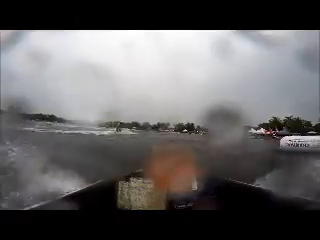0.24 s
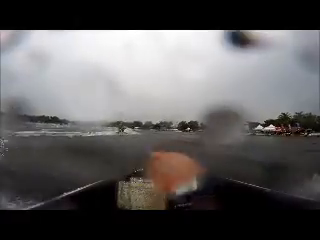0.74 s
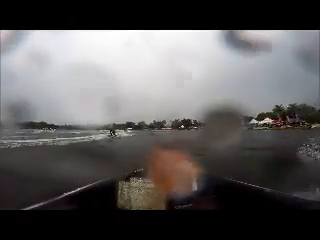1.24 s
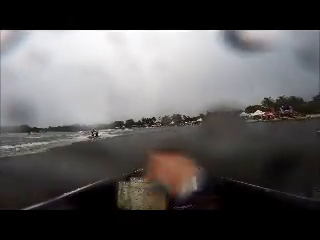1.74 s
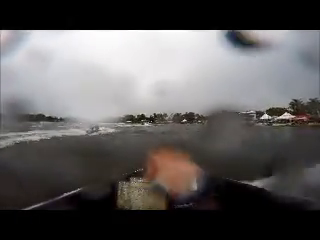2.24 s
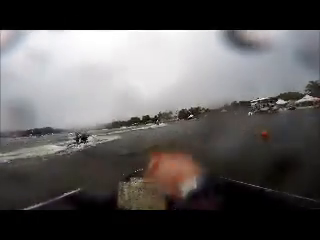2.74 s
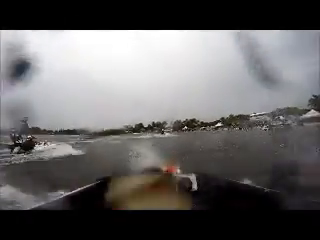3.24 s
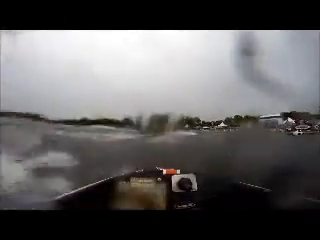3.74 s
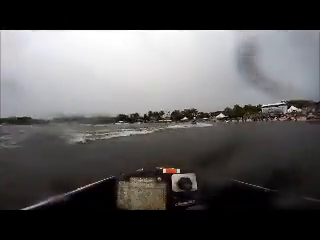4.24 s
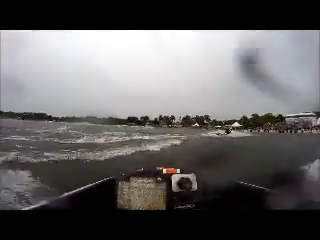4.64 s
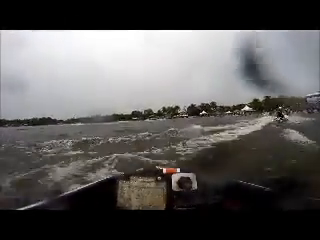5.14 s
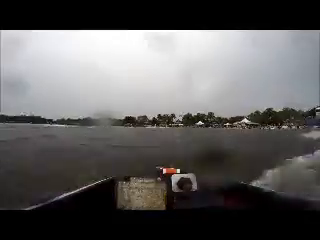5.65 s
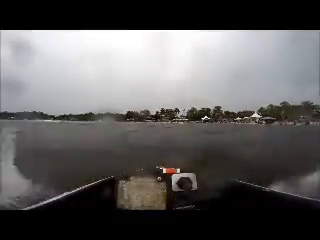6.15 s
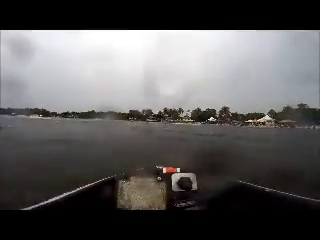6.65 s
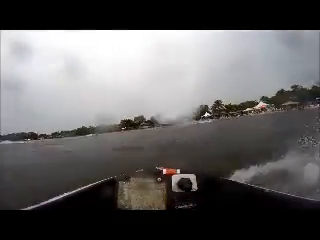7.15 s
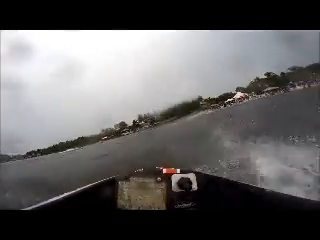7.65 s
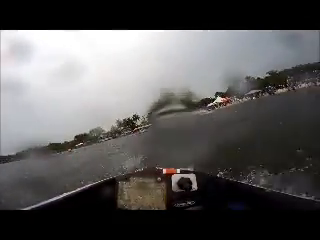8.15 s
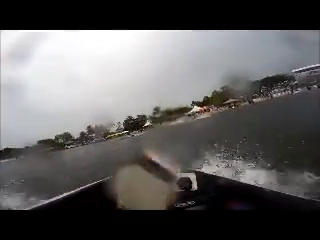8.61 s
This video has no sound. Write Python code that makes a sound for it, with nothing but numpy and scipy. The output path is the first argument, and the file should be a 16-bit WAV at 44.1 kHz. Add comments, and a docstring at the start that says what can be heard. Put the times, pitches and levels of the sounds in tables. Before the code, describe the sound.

Heard from its deck, a speeding personal watercraft booms and revs in short bursts, with waves knocking the hull and spray ticking.

```python
"""Out on choppy water, a personal watercraft races along, heard from a sealed camera fixed to its deck.
The engine booms through the deck while the jet pump bites; each time the intake gulps air, the crank
runs free and flares into an exhaust note and a rasp in the hull. Underneath, the hull rumbles and water
rushes along it; waves slap and slam it, and spray ticks on the camera housing."""
import sys
import numpy as np
from scipy import signal
from scipy.fft import rfft, irfft
from scipy.io import wavfile
from scipy.ndimage import uniform_filter1d

SR = 44100
rng = np.random.default_rng(int(sys.argv[2]) if len(sys.argv) > 2 else 0)


def dump(signal):
    """Clip the signal to [-1, 1] and save it as 16-bit WAV at the path in sys.argv[1]."""
    limited = np.clip(np.atleast_2d(signal).T, -1, 1)
    pcm = np.round(limited * 32767).astype(np.int16)
    wavfile.write(sys.argv[1], SR, pcm)


N = 391608
T = np.arange(N) / SR

# hull panel resonances: f/Hz, width/Hz, boost/dB
PANEL_MODES = [(817.4, 31, 8), (1111, 150, 10.5), (1269, 85, 4.5), (1550, 71, 8), (1770, 57, 3),
               (1883, 58, 4), (2120, 55, 1.5), (2363, 52, 3.5)]
# colour of water striking the hull: f/Hz, level/dB
SLAP_EQ = [(80, -1), (170, 12), (300, 2.5), (600, -3), (900, -12), (1150, -5), (1600, -7.5), (2300, 1),
           (2700, -12.5), (3300, -21), (4200, -25), (5000, -36), (7000, -38), (9000, -56.5)]
# colour of the camera housing: f/Hz, level/dB
HOUSING_EQ = [(500, -9.5), (2000, 4), (3000, 1), (4700, -7.5), (6500, -7), (8000, -16.5), (9200, -22),
              (11500, -24)]
# the intake gulps air and the engine flares: t at the top/s, run-up/s, hold/s, slowing/s,
# air after the top/s, top crank speed/Hz, rasp/dB, exhaust/dB, loose panel/dB, rasp decay/s
ENGINE_FLARES = [(1.075, .13, 0.0074, .05, 0.014, 72.88, -23, -19.5, -27, 0.024),
                 (1.139, .17, 0.034, 0.085, 0.026, 82.56, -25.5, -30, -34, 0.021),
                 (1.469, 0.12, .01, .05, 0.018, 74.64, -28, -23.5, -33, 0.045),
                 (1.586, .21, 0.047, 0.1, 0.076, 102.7, -18, -19, -22.5, 0.054),
                 (1.665, 0.19, .051, 0.067, 0.062, 94.55, -19.5, -22.5, -20.5, 0.034),
                 (1.911, 0.085, .04, .063, 0.058, 81.1, -25, -24.5, -37, .04),
                 (2.14, 0.094, 0.044, 0.063, 0.076, 92.8, -25, -28, -26, 0.062),
                 (2.281, 0.033, .01, .04, 0.037, 79, -25, -21.5, -44, 0.048),
                 (2.375, 0.12, 0.037, 0.061, 0.042, 103, -20.5, -21.5, -22.5, .03),
                 (2.499, 0.049, 0.0097, 0.038, 0.035, 75.15, -28, -23.5, -44, 0.041),
                 (2.564, .09, .08, .12, 0.058, 83.87, -27.5, -31.5, -42, 0.033),
                 (2.889, .1, 0.011, 0.052, 0.033, 73.9, -23, -20.5, -43, .05),
                 (2.964, 0.16, .03, 0.099, 0.04, 94.37, -18.5, -22.5, -23, .016),
                 (4.058, .14, .02, .079, 0.016, 79.53, -26.5, -26, -44, 0.061),
                 (4.314, .16, .05, .12, 0.0084, 78.9, -22, -21, -26.5, 0.074),
                 (4.685, .08, 0.0096, 0.044, .02, 69.13, -25, -21, -35, 0.059),
                 (4.83, .18, 0.16, .11, 0.17, 107.6, -17.5, -19, -33, 0.037),
                 (5.256, .11, 0.0096, 0.048, 0, 78.85, -29.5, -25.5, -37, 0.067),
                 (5.374, 0.18, 0.075, 0.063, 0, 104.1, -20, -19.5, -33, 0.011),
                 (5.632, 0.069, .066, .07, 0.049, 84.3, -25.5, -25, -37, 0.058),
                 (5.86, 0.068, 0.036, .069, 0.041, 68.74, -28, -28.5, -47, 0.043),
                 (6.191, .14, 0.0092, 0.073, 0.026, 90.1, -19.5, -22.5, -45, 0.021)]


def amp(db):
    """Decibels to gain."""
    return 10 ** (np.asarray(db) / 20)


def unit(x):
    """Scales to rms 1."""
    return x / np.sqrt(np.mean(x ** 2) + 1e-20)


def eq_db(eq, hz):
    """Reads an EQ curve on a log-frequency axis."""
    f, db = np.transpose(eq)
    return np.interp(np.log(hz + 1), np.log(f), db)


def body(x, eq, modes=(), size=8192):
    """Plays x through a body: a minimum-phase EQ curve with resonances on top."""
    hz = abs(np.fft.fftfreq(size, 1 / SR))
    db = eq_db(eq, hz) + sum(boost / (1 + (2 * (hz - f) / width) ** 2) for f, width, boost in modes)
    spectrum = np.exp(np.conj(signal.hilbert(np.log(amp(db)))))
    impulse = np.fft.ifft(spectrum).real[:size // 2]
    return signal.oaconvolve(x, impulse)[:len(x)]


def ring(x, hz, width_hz):
    """One steep resonance: two band-passes in series."""
    b, a = signal.iirpeak(hz, hz / width_hz, SR)
    return signal.lfilter(b, a, signal.lfilter(b, a, x))


def wander(hz):
    """Smooth random modulation of rms 1, rolling off above hz."""
    f = np.fft.rfftfreq(N, 1 / SR)
    return unit(irfft(rfft(rng.standard_normal(N)) * np.exp(-(f / hz) ** 2), N))


def patter(per_s, spread_db):
    """Random clicks; a few stand out if the spread is positive, or sink back if it is negative."""
    size = amp(spread_db * np.minimum(rng.exponential(1, N), 4))
    return unit(size * rng.choice([-1, 1], N) * (rng.random(N) < per_s / SR))


def add(mix, s, sound):
    """Mixes a sound in at time s."""
    part = mix[max(round(s * SR), 0):][:len(sound)]
    part += sound[:len(part)]


def splashes(hits, eq, modes, crack_s, tail_s, tail_db, hollow_db, size=4096):
    """Each hit is a short crack and a ragged, dying splatter, with a hollow ring at its own pitch."""
    out, t = np.zeros(N), np.arange(size) / SR
    crack = t / crack_s * np.exp(1 - t / crack_s)
    for s, db, hz in hits:
        splatter = unit(np.repeat(rng.exponential(1, size // 64), 64))
        force = rng.choice([-1, 1], size) * (crack + amp(tail_db) * splatter * np.exp(-t / tail_s))
        hit = body(force, eq, [*modes, (hz, hz / 4, hollow_db)])
        add(out, s, amp(db) * hit / abs(hit).max())
    return out


def level_swings(swell_s=.015, fall_s=.023, recover_s=.062):
    """The level swells, wavers and ducks briefly, mostly after loud thuds, then recovers."""
    # the hull shoulders into a wave, and engine and water swell: t/s, boost/dB
    surges = [(1.339, 7.5), (2.776, 7), (3.82, 1), (6.016, 5.5), (7.46, 2.5)]
    # brief dips in level: t/s, length/s, low end/dB, top/dB
    dips = [(0, 0.002, -17, -3.5), (1.234, 0.035, -5.5, -2.5), (3.007, 0.11, -2, -0.5),
            (3.169, 0.12, -13.5, -14), (3.486, .005, -4, 2), (3.855, 0.0047, -0.5, -5.5),
            (4.454, 0.025, -10, -4), (5.384, 0.044, -9, 0.5), (6.216, 0.093, -5, -5.5),
            (6.407, 0.028, -4.5, -8), (6.616, 0.038, -8.5, -7), (6.691, 0.0038, -2, 1.5),
            (6.85, 0.0036, -5, 0.5), (6.936, 0.0041, -3.5, 0), (7.328, 0.056, -17, -12.5),
            (7.719, .11, -13, -9), (8.866, .02, -5.5, 3)]
    surge_db = sum(db * np.exp(-((T - s) / swell_s) ** 2) for s, db in surges)
    low_db = surge_db + 1.2 * wander(hz=11)
    high_db = surge_db + .9 * wander(hz=11)
    for s, length_s, low_dip_db, high_dip_db in dips:
        dip = np.interp(T, [s - fall_s, s, s + length_s, s + length_s + recover_s], [0, 1, 1, 0])
        low_db += low_dip_db * dip
        high_db += high_dip_db * dip
    return amp(low_db), amp(high_db)


def hull_rumble():
    """A bed of deep noise from the hull running over the chop."""
    # colour of the rumble: f/Hz, level/dB
    rumble_eq = [(12, -31), (28, -8), (45, 4), (70, 2.5), (130, -25.5), (400, -86)]
    return amp(-24.5) * unit(body(rng.standard_normal(N), rumble_eq))


def drones(waver=.0043):
    """Nearly steady tones swell and fade while the craft runs level."""
    # tones in the opening rush: t/s, length/s, f/Hz, level/dB
    tones = [(0, 0.28, 416.2, -33.5), (.17, 0.37, 264, -36.5), (0.276, .52, 534, -38.5),
             (0.576, 0.21, 404, -42)]
    out = 0
    for s, length_s, hz, db in tones:
        progress = np.clip((T - s) / length_s, 0, 1)
        swell = np.sqrt(np.sin(np.pi * progress).clip(0))
        cycles = np.cumsum(hz * (1 + waver * wander(hz=15))) / SR
        out += np.sqrt(2) * amp(db) * swell * np.sin(2 * np.pi * cycles)
    return out


def water_rush(wash_gain, boom_gain, free):
    """Fine drops merge into a sheet; larger ones tick on the housing, and wavelets lap the seated hull."""
    # colour of the sheeting water: f/Hz, level/dB
    sheet_eq = [(200, -18.5), (500, -12), (900, 2.5), (1300, -2), (1800, 1.5), (2500, 7), (3200, -10),
                (3900, -7.5), (4800, -16.5), (5900, -15.5), (7500, -18.5), (9000, -39), (11500, -36.5)]
    sheet = unit(body(patter(per_s=9900, spread_db=4), sheet_eq))
    spray = amp(-16) * unit(body(patter(per_s=35, spread_db=3.5), HOUSING_EQ))
    laps = amp(-37) * unit(body(patter(per_s=60, spread_db=-4.5), SLAP_EQ, PANEL_MODES))
    return wash_gain * (sheet + (1 - .48 * free) * spray) + np.sqrt(boom_gain) * (1 - free) * laps


def bright_ticks():
    """Bright ticks of spray, plus a short high squirt on the two hardest landings."""
    # ticks and squirts: t/s, peak/dB, f/Hz
    ticks = [(0.081, -21, 3650), (0.9675, -20.5, 3290), (2.2549, -10, 5970), (2.7697, -23, 6017),
             (3.1324, -26, 6050), (3.1395, -25, 6480), (3.471, -15.5, 6700), (3.5133, -25, 5970),
             (3.525, -35, 6000), (3.584, -37, 6025), (3.671, -34, 6200), (3.685, -38, 6195),
             (3.757, -35, 4000), (3.787, -28, 3980), (3.8245, -30, 6000), (4.1806, -22.5, 3492),
             (4.9793, -19, 9010), (5.1285, -34, 4000), (6.2811, -48, 3797), (6.3885, -40, 5994),
             (6.4655, -37, 4013), (6.469, -35, 3996), (6.4812, -30, 3980), (6.5066, -33, 6450),
             (6.5875, -36, 5950), (6.596, -34, 6515), (6.6755, -26, 6474), (6.7525, -21, 5930),
             (6.8259, -37, 5975), (6.9979, -17.5, 6600), (7.0404, -21, 3946), (7.1078, -45, 6486),
             (7.127, -29, 3977), (7.2689, -29, 4000), (7.2864, -29, 4000), (7.4615, -36, 6490),
             (7.6838, -19, 3875), (7.6935, -30, 6500), (7.76, -45, 4010), (8.068, -30, 3991),
             (8.146, -32, 4010), (8.236, -34, 3980), (8.76, -30, 4000)]
    return splashes(ticks, HOUSING_EQ, (), crack_s=.00041, tail_s=.0079, tail_db=-14.5, hollow_db=5.5)


def wave_slaps():
    """Waves knock on the hull and set its panels ringing."""
    # slaps: t/s, peak/dB, f of the knock/Hz
    slaps = [(3.0794, -13.5, 1111), (3.1293, -3.5, 2131), (3.162, -23, 2207), (3.21, -29, 1120),
             (3.5848, -23.5, 1142), (3.8052, -12.5, 1143), (3.9475, -15, 1128), (4.4626, -23.5, 1121),
             (5.1626, -20.5, 1108), (5.3378, -15, 1509), (5.3567, -5.5, 2232), (5.7688, -17.5, 1918),
             (5.8546, -11, 1222), (5.9512, -10, 1143), (5.9739, -5.5, 1209), (6.0392, -12.5, 1095),
             (6.0674, -16.5, 1158), (6.1665, -8.5, 1893), (6.1864, -3, 1572), (6.2412, -20.5, 2075),
             (6.2811, -25, 2000), (6.3194, -18.5, 1116), (6.3295, -25, 2203), (6.3525, -23, 1134),
             (6.364, -24, 2211), (6.376, -29, 1200), (6.4515, -23.5, 1131), (6.469, -21, 1195),
             (6.4897, -26, 2207), (6.5495, -19, 1220), (6.5715, -6.5, 1264), (6.7561, -23, 1157),
             (6.8125, -19, 1100), (6.8324, -28, 1167), (6.998, -15, 2353), (7.3432, -35, 1110),
             (7.3707, -27.5, 1182), (7.4466, -18, 1150), (7.4542, -14.5, 1082), (7.4729, -21.5, 1130),
             (7.5163, -21, 1142), (7.6236, -15.5, 1140), (7.6834, -5, 2302), (7.883, -21, 1150),
             (7.9736, -17, 1124)]
    return splashes(slaps, SLAP_EQ, PANEL_MODES, crack_s=.0012, tail_s=.011, tail_db=-14, hollow_db=6)


def hull_slams(rise_s=.013, sharpness=2.9):
    """A hard landing heaves the whole deck in one deep, dead thud."""
    # landings: t/s, level/dB, f/Hz
    landings = [(3.127, -3.5, 60), (5.352, -10, 50), (6.187, -5, 50), (6.573, -7, 54), (7.680, -3.5, 60)]
    out, t = np.zeros(N), np.arange(6000) / SR
    heave = (t / rise_s * np.exp(1 - t / rise_s)) ** sharpness
    for s, db, hz in landings:
        add(out, s, -amp(db) * heave * np.sin(2 * np.pi * hz * t))
    return out


def pump_churn(angle):
    """Gulps of air and water froth in the pump, beaten once a crank turn."""
    # the intake breaks the surface: t/s, half length/s, level/dB
    gulps = [(0.078, 0.026, -29), (.63, 0.021, -32), (0.991, 0.036, -21.5), (1.424, 0.024, -36),
             (2.853, 0.01, -48), (3.96, 0.034, -29), (4.219, 0.028, -21), (4.659, 0.035, -33),
             (5.125, 0.0099, -42), (5.339, .025, -27), (5.857, 0.023, -34)]
    # colour of the froth: f/Hz, level/dB
    froth_eq = [(140, -25.5), (230, 4.5), (310, -2.5), (420, 4.5), (520, -0.5), (650, -12.5), (1200, -46),
                (6000, -79.5)]
    gain = sum(amp(db) * np.exp(-((T - s) / half_s) ** 2) for s, half_s, db in gulps)
    froth = patter(per_s=1800, spread_db=1) * (1 + .5 * np.cos(angle))
    return gain * unit(body(froth, froth_eq))


def crank_speed(cruise_hz, smooth_s=.026):
    """In each flare the crank runs up, holds, and is dragged back to cruising speed as the pump bites."""
    lift_hz = 0
    for s, run_s, hold_s, bite_s, _, top_hz, *_ in ENGINE_FLARES:
        arch = np.interp(T, [s - run_s, s, s + hold_s, s + hold_s + bite_s], [0, 1, 1, 0])
        lift_hz = np.maximum(lift_hz, arch * (top_hz - cruise_hz))
    return uniform_filter1d(cruise_hz + lift_hz, round(smooth_s * SR))


def flare_gains(rasp_lead_s=.021, exhaust_lead_s=.018, exhaust_fade_s=.018):
    """Rasp, exhaust and loose panel swell just ahead of the heavy crank, and die as the intake refills."""
    def envelope(since_top, run_s, hold_s, fade_s):
        attack = np.clip(1 + since_top / run_s, 0, 1)
        return attack * np.exp(-np.maximum(since_top - hold_s, 0) / fade_s)
    rasp_gain = exhaust_gain = panel_gain = 0
    for s, run_s, _, _, air_s, _, rasp_db, exhaust_db, panel_db, fade_s in ENGINE_FLARES:
        shaking = envelope(T - s + rasp_lead_s, run_s, air_s, fade_s)
        blowing = envelope(T - s + exhaust_lead_s, run_s, air_s, exhaust_fade_s)
        rasp_gain = np.maximum(rasp_gain, amp(rasp_db) * shaking)
        panel_gain = np.maximum(panel_gain, amp(panel_db) * shaking ** 2)
        exhaust_gain = np.maximum(exhaust_gain, amp(exhaust_db) * blowing)
    return rasp_gain, exhaust_gain, panel_gain


def exhaust(angle, speed, racing, sputter_db=2):
    """Engine orders sweep through the exhaust box; under water the outlet mostly gurgles."""
    # exhaust tones: multiple of crank speed, level/dB
    orders = [(2, 1), (3, 1.5), (4, 2), (5, -11), (6, 2), (7, -12), (8, -4), (10, -2)]
    # colour of the exhaust box: f/Hz, level/dB
    box_eq = [(60, -46.5), (143, 0), (200, -14), (250, -5.5), (285, -10), (320, -5.5), (370, 1.5),
              (425, 4.5), (490, -1.5), (570, -17.5), (680, -14.5), (1000, -34), (2000, -66)]
    flat_out = np.clip((speed - 90) / 15, 0, 1)  # the note steadies and clears at top speed
    tones = power = 0
    for order, db in orders:
        strength = amp(db + eq_db(box_eq, order * speed))
        waver = 1 + (.38 - .2 * flat_out) * wander(hz=28)
        tones += strength * waver * np.cos(order * angle + 2 * np.pi * rng.random())
        power += strength ** 2 / 2
    gurgle = amp(racing * (-8 - 5 * flat_out))
    bubbles = unit(body(patter(per_s=4900, spread_db=-2.5), box_eq))
    honk = (power / power.mean()) ** racing  # louder where an order meets a resonance of the box
    sputter = unit(amp(sputter_db * (1 - .7 * flat_out) * wander(hz=45)))  # uneven firing
    return honk * sputter * (tones / np.sqrt(power) + gurgle * bubbles) / np.sqrt(1 + gurgle ** 2)


def engine_rasp(angle, free, racing, hull_gain, panel_gain):
    """Two firings a turn buzz and puff into hull and loose panel; under load they chug every two turns."""
    # colour of the hull lifted clear: f/Hz, level/dB
    lifted_eq = [(150, -26.5), (450, 4), (650, -2), (920, -10), (1250, -3), (2000, -2), (2600, -6),
                 (3200, -22), (4000, -32), (5000, -53.5), (6700, -27.5), (8600, -53.5), (11500, -45)]
    # colour of the hull seated in the water: f/Hz, level/dB
    seated_eq = [(150, -34), (550, -0.5), (780, -6), (920, -7.5), (1150, -5.5), (1300, -5.5), (2000, -5),
                 (2600, -12.5), (3200, -22), (5000, -33), (11500, -55.5)]
    # resonances that drone under load: f/Hz, width/Hz, boost/dB
    loaded_modes = [(523, 48, 6), (780, 39, 10), (1100, 250, 2)]
    buzz = 0
    for order in range(8, 50):
        gargle = 1 + .8 * wander(hz=30)
        buzz += gargle * np.cos(order * angle + 2 * np.pi * rng.random()) / (1 + .5 * (order % 2))
    chug = (1 - free) * np.cos(angle / 2)
    firing = 1 + .4 * free * np.cos(2 * angle) + .45 * chug
    puffs = unit(firing * rng.standard_normal(N))
    buzz_gain = amp(-8 + 4.5 * racing)
    drive = (puffs + buzz_gain * unit(buzz)) / np.sqrt(1 + buzz_gain ** 2)
    lifted = unit(body(drive, lifted_eq, PANEL_MODES))
    seated = unit(body(drive, seated_eq, PANEL_MODES + loaded_modes))
    hull = unit(free * lifted + (1 - free) * seated) * amp(1.6 * wander(hz=40))
    panel = unit((1 + .6 * chug) * ring(drive, hz=1150, width_hz=55))
    return hull_gain * hull + panel_gain * panel


def engine_boom(angle, speed, free, drag, choke_db=-10):
    """The crank shakes the deck; under load alternate turns differ, which gives half orders."""
    # deck shake: multiple of crank speed, level with the pump biting/dB, level racing free/dB
    orders = [(.5, -14, -22), (1, 4, 4), (1.5, -6.5, -18.5), (2, -19.5, -13)]
    # how the deck passes the shake on: f/Hz, level/dB
    deck_eq = [(20, -6), (85, 1.5), (112, -2), (121, -1.5), (131, 17.5), (147, 12.5), (165, 6.5),
               (184, -3.5), (214, 9.5)]
    # colour of the deck's buffeting: f/Hz, level/dB
    buffet_eq = [(12, -22.5), (28, -5), (45, 4), (70, -5), (110, -2.5), (170, -19), (300, -15), (700, -77)]
    tones = 0
    for order, biting_db, free_db in orders:
        db = biting_db + free * (free_db - biting_db) + eq_db(deck_eq, order * speed)
        db += choke_db * drag * (order > 1)  # the overtones choke as the pump bites
        waver = 1 + .17 * max(order, 1) ** 1.5 * wander(hz=22)
        tones += amp(db) * waver * np.cos(order * angle)
    buffet = amp(-11.5 - 3.5 * free) * unit(body(rng.standard_normal(N), buffet_eq))
    return unit(unit(tones) + buffet)


def scene():
    """Engine, water and spray, all carried to the camera through the deck."""
    # running between flares: t/s, crank speed/Hz, boom/dB, exhaust/dB, rasp/dB, loose panel/dB, wash/dB
    cruise = [(0, 52.7, -11, -27, -28.5, -59, -41), (.3, 52.5, -12, -31.5, -28, -52, -43),
              (.55, 50.45, -9.5, -30, -27.5, -38, -42), (.85, 52.52, -10.5, -31.5, -31.5, -52, -43),
              (1.32, 49.12, -13, -33.5, -36, -59, -45), (1.78, 63.88, -15.5, -29, -35, -45, -48),
              (1.98, 69, -18, -33, -28.5, -54, -41), (2.05, 70.75, -14, -20.5, -26.5, -45, -41),
              (2.23, 79.1, -19, -34, -25, -34, -42), (2.48, 71.7, -15, -30.5, -31, -37, -43.5),
              (2.75, 49.86, -14.5, -39.5, -39, -53, -49.5), (3.4, 53.84, -17, -31.5, -34, -60, -47),
              (3.55, 46.12, -13.5, -34.5, -46, -66, -47), (3.68, 59.23, -13, -35.5, -50, -56, -45),
              (3.88, 55.55, -12, -29.5, -28, -51, -41.5), (4.17, 56.2, -14.5, -33, -37.5, -51.5, -44.5),
              (4.58, 46.11, -11, -31, -35.5, -75, -43.5), (5.13, 52.18, -14.5, -35, -40, -42.5, -49),
              (5.42, 65.75, -19, -30, -30.5, -41, -42.5), (5.53, 72.2, -18, -35.5, -35.5, -50.5, -50),
              (5.79, 55.94, -16.5, -38.5, -43, -54, -47), (6.03, 60.87, -17.5, -31, -35, -44, -45.5),
              (6.4, 47.97, -16.5, -41, -53, -57, -50.5), (6.82, 52.95, -10.5, -32.5, -38, -63, -45),
              (7, 58.8, -13, -34, -41, -69, -47), (7.24, 56.05, -8, -38, -42.5, -57, -48.5),
              (7.55, 53.16, -14, -39.5, -38.5, -48, -47.5), (8, 44.84, -12.5, -38, -39, -42.5, -48.5),
              (8.2, 50.02, -12.5, -35, -33.5, -39, -46.5), (8.4, 47.67, -11.5, -36.5, -35.5, -37, -46.5),
              (8.65, 46.48, -11.5, -38.5, -33.5, -40, -46), (8.88, 44.88, -10, -39, -39.5, -49, -52.5)]
    times, *lanes = np.transpose(cruise)
    cruise_hz, boom_db, exhaust_db, rasp_db, panel_db, wash_db = (np.interp(T, times, x) for x in lanes)
    speed = crank_speed(cruise_hz)
    free = np.clip((speed - 57) / 16, 0, 1)  # 0 with the pump biting, 1 with air in the intake
    # the note is clearest at high speed, and is smothered as the pump drags the crank down
    drag = np.clip(-uniform_filter1d(np.gradient(speed) * SR, size=1500) / 200, 0, 1)
    racing = np.interp(speed, [55, 66, 105], [0, .85, 1]) * (1 - .85 * drag)
    low, high = level_swings()  # gains for the low end and the top
    jitter = (.004 + .007 * free * (speed < 100)) * wander(hz=40)
    angle = 2 * np.pi * np.cumsum(speed * (1 + jitter)) / SR

    rasp_flare, exhaust_flare, panel_flare = flare_gains()
    boom_gain = low * amp(boom_db - .142 * (speed - cruise_hz))  # a free crank shakes the deck less
    exhaust_gain = high * np.hypot(amp(exhaust_db), exhaust_flare)
    hull_gain = high * np.hypot(amp(rasp_db), rasp_flare)
    panel_gain = high * np.hypot(amp(panel_db), panel_flare)
    wash_gain = high * np.hypot(amp(wash_db), amp(-15.5) * rasp_flare)  # flares throw water on the hull

    mix = boom_gain * engine_boom(angle, speed, free, drag)
    mix += exhaust_gain * exhaust(angle, speed, racing)
    mix += pump_churn(angle) + drones()
    mix += engine_rasp(angle, free, racing, hull_gain, panel_gain)
    mix += np.sqrt(low) * hull_rumble() + wave_slaps() + hull_slams()
    mix += bright_ticks() + water_rush(wash_gain, boom_gain, free)
    return mix[None]


def record(dry, cutoff_hz=12000):
    """A soft clip rounds off peaks near full scale; a steep low-pass trims the top."""
    clipped = dry / (1 + dry ** 8) ** (1 / 8)
    low_pass = signal.firwin(511, cutoff_hz, window=("kaiser", 9), fs=SR)
    return signal.oaconvolve(clipped, low_pass[None], "same")


dry = scene()
out = record(dry)
dump(out)
```